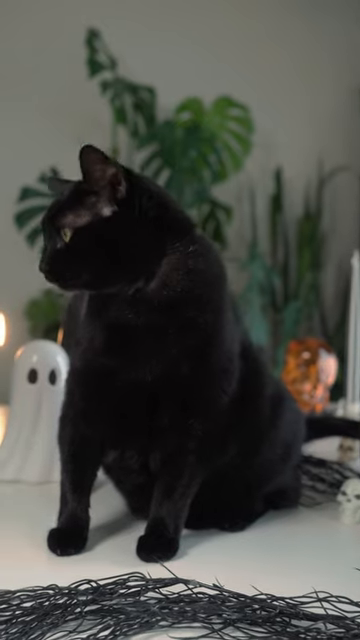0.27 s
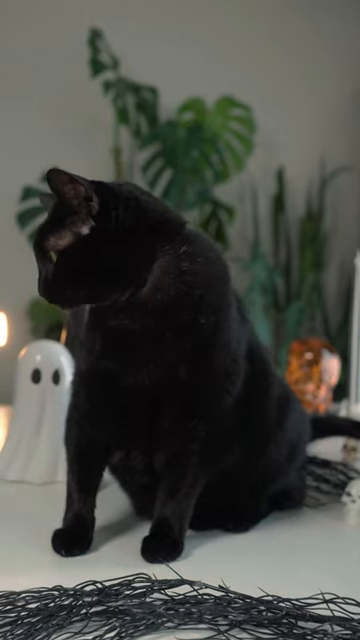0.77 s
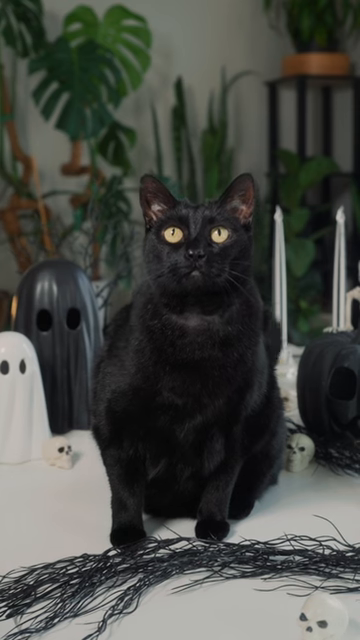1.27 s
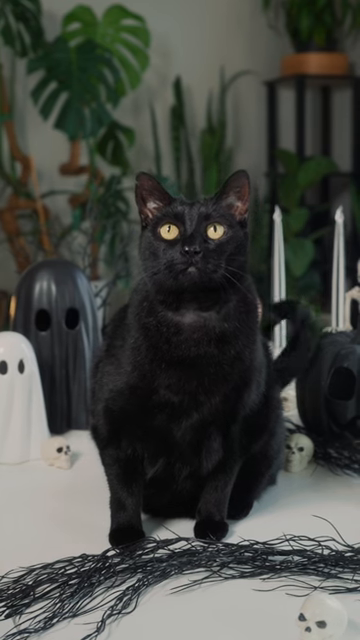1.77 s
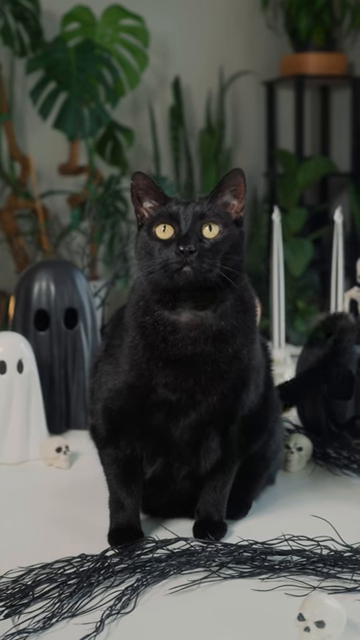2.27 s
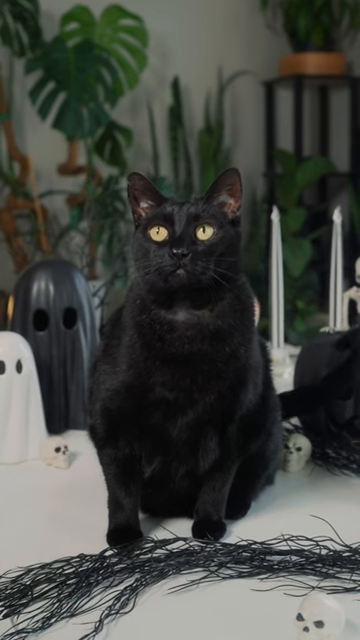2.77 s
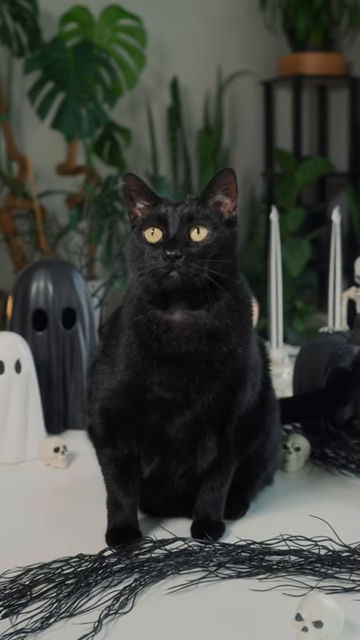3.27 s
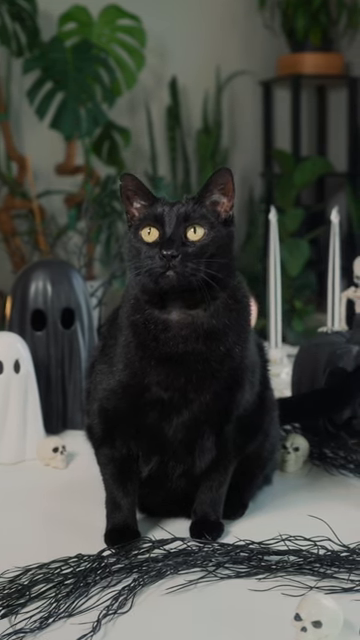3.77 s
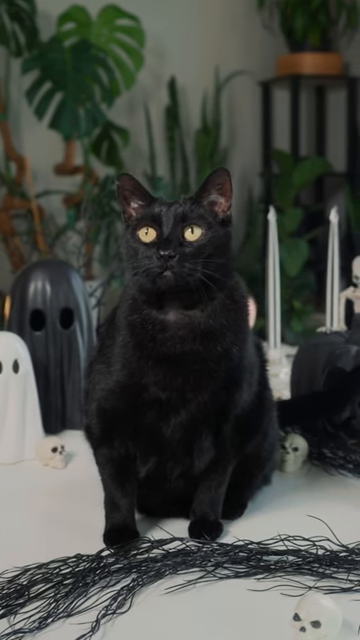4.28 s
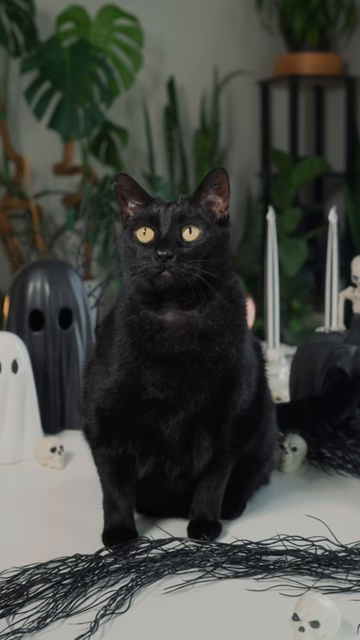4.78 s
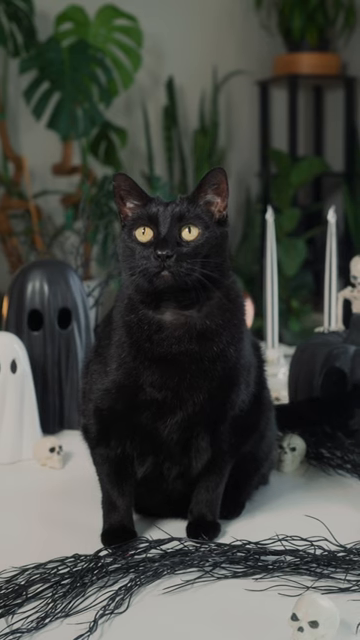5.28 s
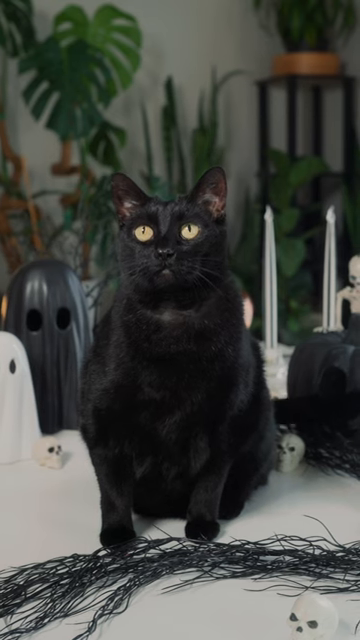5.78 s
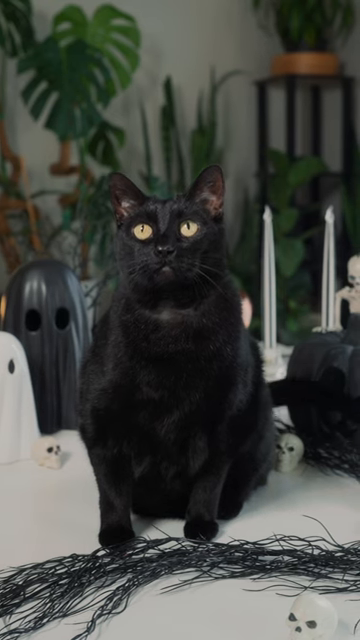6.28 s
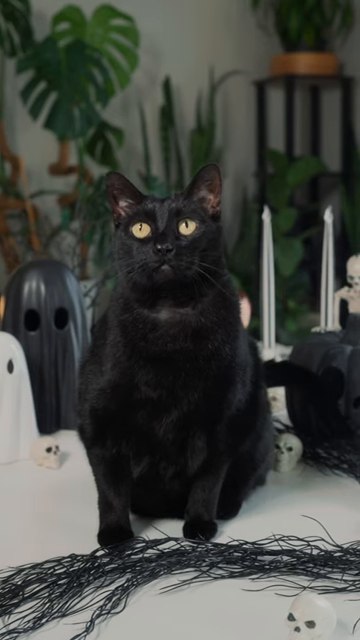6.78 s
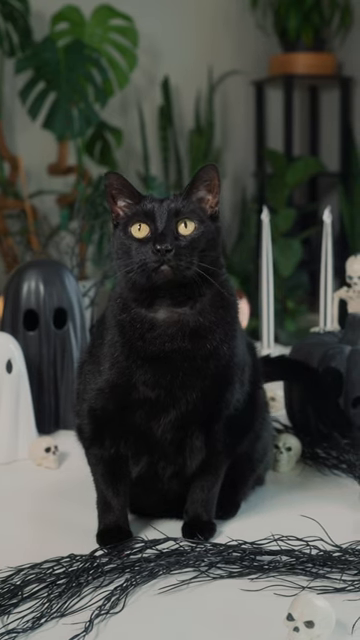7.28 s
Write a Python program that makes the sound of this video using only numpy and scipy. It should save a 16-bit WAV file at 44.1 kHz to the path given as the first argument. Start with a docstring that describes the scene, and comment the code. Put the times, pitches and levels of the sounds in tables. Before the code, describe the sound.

A cat purrs very close to the microphone in a quiet room. The low, fluttering rumble runs through both the in-breath and the out-breath, dipping briefly at each turn, about twice a second. Air rustles softly through its nose, and now and then its mouth gives a small wet click. Near the middle, the microphone picks up a faint, deep handling rumble.

```python
"""A cat purrs right at the microphone in a quiet room, on the in-breath and the out-breath alike.
Its larynx is a valve that interrupts the breath about 26 times a second: it shuts with a soft knock,
dams the air (the rumble) and snaps open, exciting the resonances of throat and head.
While it is open, turbulent air rustles through the nose. Beneath lie faint room noise and the
handling rumble of the nudged microphone; now and then the mouth clicks wetly."""
import sys
import numpy as np
from scipy import signal
from scipy.fft import rfft, irfft
from scipy.io import wavfile
from scipy.ndimage import uniform_filter1d

SR = 44100
rng = np.random.default_rng(int(sys.argv[2]) if len(sys.argv) > 2 else 0)


def dump_mix(stems):
    """Bounce the given channels to the path in sys.argv[1] as a 16-bit WAV at rate SR."""
    frames = np.atleast_2d(stems).T  # one column per channel
    limited = np.clip(frames, -1, 1)  # hard clip at full scale
    pcm = np.round(limited * 32767).astype(np.int16)
    wavfile.write(sys.argv[1], SR, pcm)


N = 332514
TIME = np.arange(N) / SR


def undb(db):
    """Amplitude ratio of a level in decibels."""
    return 10 ** (np.asarray(db) / 20)


def unit(x):
    """Normalisation to rms 1."""
    return x / np.sqrt(np.mean(x ** 2))


def impulses(times, sizes):
    """Impulse excitation: one-sample pushes at the given times."""
    out = np.zeros(N)
    np.add.at(out, np.clip((times * SR).astype(int), 0, N - 1), sizes)
    return out


def colour(x, points, pitch=1, size=4096):
    """Minimum-phase filter with an (f/Hz, level/dB) outline, shifted by a pitch ratio."""
    hz, db = np.transpose(points)
    grid = np.maximum(np.arange(size // 2 + 1) * SR / size, 1)
    outline_db = np.interp(np.log(grid), np.log(hz * pitch), db)
    cepstrum = irfft(np.log(undb(outline_db)))
    cepstrum[1:size // 2] *= 2
    cepstrum[size // 2 + 1:] = 0
    return signal.fftconvolve(x, irfft(np.exp(rfft(cepstrum))))[:len(x)]


def resonate(x, modes, pitch=1):
    """Modal superposition, two stages a mode; bony cavities follow the pitch ratio only halfway."""
    out = 0
    for hz, half_width, db in modes:
        b, a = signal.iirpeak(hz * np.sqrt(pitch), hz / (2 * half_width), fs=SR)
        out = out + undb(db) * signal.lfilter(b, a, signal.lfilter(b, a, x))
    return out


# Breaths, each lasting until the next: t/s, direction (+1 in, -1 out), flutter cycles,
# airway pitch ratio, quickening/Hz, attack/s, rise/dB, fade/dB, rumble/dB, throb (its overtones)/dB,
# snap/dB, swell skew/rad, rustle/dB, hiss/dB, pharynx/dB; the last three add to the snap column
BREATH_CYCLE = [ (-.386, -1, 13, 0.92, -0.5, 0.11, 5, 15.5, -7, -14.5, -32, 0.67, -42, -45, -23),
                (0.109, 1, 12, 0.93, 0.3, 0.12, 23, 4.5, -10, -17.5, -40.5, 0.27, -6.5, -20.5, -20),
                (0.5603, -1, 13, 0.86, 0.1, 0.15, 6.5, 12, -11, -17, -37, .87, -16, -47.5, -24.5),
                (1.075, 1, 11, 0.92, -1.15, 0.18, 7.5, 4.5, -10.5, -17.5, -39.5, 0.13, -5, -20, -20.5),
                (1.491, -1, 14, 0.87, 2.5, 0.22, 3.5, 15.5, -11.5, -18, -37.5, 0.9, -15, -45, -22.5),
                (2.053, 1, 12, 0.88, 0.36, 0.097, 8.5, 9, -16.5, -26, -40, .28, -12, -34.5, -28.5),
                (2.4983, -1, 14, 0.93, -0.3, .13, 7.5, 12.5, -18.5, -26, -43, 0.78, -10, -34.5, -55),
                (3.056, 1, 11, .97, 0, 0.37, 26, 10, -5.5, -14.5, -29, 0.74, -11.5, -39.5, -23.5),
                (3.461, -1, 13, 0.97, 2.5, 0.076, 0.5, 15, -6.5, -12.5, -33, 1, -15, -48, -27),
                (3.9658, 1, 15, 1.018, -0.2, 0.081, 9.5, 4.5, -9.5, -19, -32, 0.32, -15, -41, -38.5),
                (4.519, -1, 13, 0.95, 2.5, 0.061, 2, 15, -13.5, -19, -36.5, .83, -15, -43, -38),
                (5.031, 1, 12, 0.98, -1, .13, 13, 9.5, -11.3, -24.5, -37.5, 1.5, -16, -39, -47),
                (5.4742, -1, 15, 0.97, 1, 0.19, 4, 14, -19.5, -25.5, -43.5, 0.98, -16, -38.5, -42),
                (6.068, 1, 12, 0.97, 0.3, 0.12, 14.5, 7, -13, -25, -38, 1.6, -16, -48, -55),
                (6.531, -1, 18, 0.96, 2.15, 0.17, 2.5, 16, -22, -26.5, -43.5, 1, -18, -49, -39.5),
                (7.26, 1, 12, 0.96, -0.5, 0.13, 7, 10, -14, -27, -38, 1.2, -14.5, -39, -43)]


def purr(end_s=7.7105, muscle_s=0.014):
    """Common modulation: one flutter and one muscular effort drive rumble, snaps and airflow."""
    breaths = np.array(BREATH_CYCLE)
    turns = np.append(breaths[:, 0], end_s)
    current = np.searchsorted(turns, TIME, "right") - 1
    (start, direction, cycles, _, quickening_hz, attack_s, rise_db, fade_db,
     rumble_db, throb_db, snap_db, skew, rustle_db, hiss_db, pharynx_db) = breaths[current].T
    age, length = TIME - start, np.diff(turns)[current]
    phase = flutter(age, length, cycles, quickening_hz)
    muscle = int(muscle_s * SR)
    rising_db, fading_db = uniform_filter1d(effort(age, length, attack_s, rise_db, fade_db), muscle)
    rumble_db, throb_db, snap_db = uniform_filter1d([rumble_db, throb_db, snap_db], muscle)
    push_db, slack = rising_db + fading_db, slackness(turns)
    rumble_db += push_db
    throb_db += 0.99 * push_db + 0.5 * slack
    fade_share = np.where(direction > 0, 0.18, 0.86)  # breathing in, the snaps stay firm to the end
    snap_db += 0.64 * rising_db + fade_share * fading_db - 8.5 * slack
    return (rumble(phase, direction, skew, rumble_db, throb_db)
            + snaps(phase, direction, snap_db, pharynx_db)
            + airflow(phase, snap_db + rustle_db, snap_db + hiss_db))


def flutter(age, length, cycles, quickening_hz, start_phase=0.4):
    """Linear frequency glide: the larynx's phase in cycles, a whole number of them to each breath."""
    steady = cycles * age / length
    glide = quickening_hz * age * (age - length) / (2 * length)
    return np.unwrap(steady + glide, period=1) + start_phase


def effort(age, length, attack_s, rise_db, fade_db):
    """Power-law envelope in dB below the crest: a quick rise and an ever faster fade."""
    rising = np.clip(1 - age / attack_s, 0, 1) ** 1.6
    fading = np.clip((age - attack_s) / (length - attack_s), 0, 1) ** 2.59
    return -rise_db * rising, -fade_db * fading


def slackness(turns, lead_s=0.006, width_s=0.034):
    """Relaxation of the larynx: 1 where the flow reverses, 0 in between."""
    return sum(np.exp(-((TIME - turn + lead_s) / width_s) ** 2) for turn in turns)


def airway(x, shape, table, tail=2048):
    """Time-varying filter: the cat holds throat and nose a little differently for each breath."""
    out = np.zeros(N + tail)
    edges = [0] + [int(breath[0] * SR) for breath in BREATH_CYCLE[1:]] + [N]
    for a, b, breath in zip(edges, edges[1:], BREATH_CYCLE):
        out[a:b + tail] += shape(np.pad(x[a:b], (0, tail)), table, pitch=breath[3])
    return out[:N]


# Harmonics of the dammed air, from the flutter rate upwards: level/dB
INHALE_HARMONICS = [3, -5, -7, -21.5, -22, -33.5]
EXHALE_HARMONICS = [1, -6, -6, -17.5, -16, -25.5]


def rumble(phase, direction, skew, rumble_db, throb_db, crest=0.695, wobble=0.034, turn_s=0.013):
    """Fourier series of the pressure behind the shut larynx; its sign reverses with the flow."""
    cycles = np.arange(int(phase[-1]) + 2)
    jitter, shimmer = (np.interp(phase, cycles, c) for c in rng.standard_normal((len(cycles), 2)).T)
    angle = 2 * np.pi * (phase - crest + wobble * jitter)
    turn = int(turn_s * SR)
    inward, skew = uniform_filter1d(uniform_filter1d([(direction > 0) * 1., skew], turn), turn // 2)
    out = 0
    for share, harmonics in ((inward, INHALE_HARMONICS), (inward - 1, EXHALE_HARMONICS)):
        # skew turns the even swell into a fast rise and a slow ebb
        waves = [undb(db) * np.cos(k * angle - skew) for k, db in enumerate(harmonics, 1)]
        swell = undb(rumble_db) * unit(sum(waves[:2]))
        throb = undb(throb_db + 0.6 * shimmer) * unit(sum(waves[2:]))
        out = out + share * (swell + throb)
    return out


# Frequency response of throat and nose: f/Hz, level/dB
THROAT_RESPONSE = [(50, 11.5), (140, 7), (260, 5.5), (420, 0), (640, -2.5), (860, -4), (950, -11),
                   (1060, -21.5), (1320, -17.5), (1800, -30), (2300, -39.5), (3500, -76.5)]
# Modes of the head cavities and the pharynx: f/Hz, half-bandwidth of a stage/Hz, level/dB
HEAD_MODES = [(3300, 620, -35), (4410, 270, -36), (5590, 550, -32.5), (8020, 1330, -38), (11450, 1500, -47)]
PHARYNX_MODES = [(1693, 324, -2.5)]


def snaps(phase, direction, snap_db, pharynx_db, gain_db=48.5, shut_s=0.014, peel_s=0.0011):
    """Source and filter: once a cycle the larynx knocks shut, then snaps open, ringing the airways."""
    at = np.flatnonzero(np.diff(np.floor(phase)))
    force, treble, shut_jitter, knock, open_jitter, peel_lag = rng.standard_normal((len(at), 6)).T
    when = at / SR + 0.0004 * open_jitter
    size = direction[at] * undb(snap_db[at] + gain_db + 2 * force)
    inward = direction[at] > 0
    bright_db = np.where(inward, 0.5, -2.26) + 2.1 * treble
    knock_db = np.where(inward, -16, -5.5) + 2 * knock
    closing = impulses(when - shut_s + 0.0011 * shut_jitter, size * undb(knock_db))
    closing = signal.sosfilt(signal.butter(2, [170, 950], "band", fs=SR, output="sos"), closing)
    opening = impulses(when, size)
    # the wet folds peel apart in two steps, so every snap has its own colour
    peel = impulses(when + peel_s * (0.44 + np.abs(peel_lag)), size * undb(-11))
    throat = airway(closing + opening + peel, colour, THROAT_RESPONSE)
    head = airway(impulses(when, size * undb(bright_db)), resonate, HEAD_MODES)
    pharynx = resonate(opening * undb(pharynx_db), PHARYNX_MODES)
    return throat + head + pharynx


def gate(phase, centre, width):
    """Periodic Gaussian window; centre and width in cycles."""
    distance = (phase - centre + .5) % 1 - .5
    return np.exp(-.5 * (distance / width) ** 2)


# Spectrum of air rushing through the open larynx: f/Hz, level/dB
RUSTLE_SPECTRUM = [(80, -31.5), (180, 7.5), (400, 1), (750, -12), (1050, -19), (1350, -18.5), (2100, -36.5),
                   (3200, -32.5), (4200, -34.5), (5500, -30), (6600, -45), (8000, -30.5), (9800, -49),
                   (15000, -41.5)]
# Modes of the narrow nostrils: f/Hz, half-bandwidth of a stage/Hz, level/dB
NOSTRIL_MODES = [(2900, 220, -7), (4270, 220, -15.5), (5200, 540, -5.5), (8330, 240, 2), (11430, 1300, -3)]


def airflow(phase, rustle_db, hiss_db, rustle_gain_db=3):
    """Turbulence noise gated by the larynx; the nostrils hiss hardest just before it shuts."""
    flow = gate(phase, centre=0.26, width=0.25) + gate(phase, centre=0.5, width=0.032)
    jet = 0.22 * gate(phase, centre=0.14, width=0.076) + gate(phase, centre=0.5, width=0.045)
    rustle = unit(airway(flow * rng.standard_normal(N), colour, RUSTLE_SPECTRUM))
    hiss = unit(airway(jet * rng.standard_normal(N), resonate, NOSTRIL_MODES))
    return undb(rustle_db + rustle_gain_db) * rustle + undb(hiss_db) * hiss


# Envelope of the microphone's handling rumble: t/s, peak level/dB
SWAY_ENVELOPE = [(0, -46), (2.5, -42), (2.8, -10), (3.0, -16), (3.4, -22), (3.7, -40), (7.54, -46)]


def microphone_sway(hz=9.5, smooth_s=0.15):
    """Handling rumble: the nudged microphone wobbles, too low to hear as a tone."""
    level_db = np.interp(TIME, *np.transpose(SWAY_ENVELOPE))
    swell = uniform_filter1d(undb(level_db), round(smooth_s * SR))
    return swell * np.sin(2 * np.pi * (hz * TIME + rng.random()))


# Spectrum of the still room: f/Hz, level/dB
ROOM_SPECTRUM = [(20, -14.5), (100, -2.5), (300, -19.5), (900, -39.5), (2200, -52.5), (15000, -55)]


def room(rms_db=-59):
    """Stationary noise: the room's faint background, strongest in the bass."""
    return undb(rms_db) * unit(colour(rng.standard_normal(N), ROOM_SPECTRUM))


# Wet mouth clicks: t/s, level/dB, relative treble level/dB, gurgle f/Hz
WET_CLICKS = [(0.682, -28.5, 17, 510), (1.608, -21.5, 12.5, 330), (2.157, -23.5, 11.5, 607),
              (2.376, -24, 11, 635), (2.621, -31, 20, 700), (3.474, -19, -4, 600), (3.527, -23, -1, 340),
              (3.546, -10.5, 2, 480), (3.562, -23, 4, 295), (3.573, -24.5, 17, 416), (4.043, -9, 0, 375),
              (4.322, -16, 3, 498), (4.607, -14, 2.5, 540), (4.637, -21, 7.5, 440), (5.107, -13, -2, 596),
              (6.66, -19, 4.5, 406), (6.699, -28.5, 13, 557), (7.402, -28.5, 17.5, 714),
              (7.486, -19, 2, 503)]


def mouth_clicks(gurgle_db=-7, gurgle_s=0.0004, crackle_s=0.0018):
    """Damped free vibration: wet surfaces part, ringing throat, head and the air pocket between them."""
    gurgle, crackle = np.zeros((2, N))
    for start, level_db, treble_db, hz in WET_CLICKS:
        i = int(start * SR)
        t = TIME[:min(SR // 20, N - i)]
        pocket = np.exp(-t / gurgle_s) * np.sin(2 * np.pi * hz * t)
        gurgle[i:i + len(t)] += undb(level_db + gurgle_db) * pocket
        burst = np.exp(-t / crackle_s) * rng.standard_normal(len(t))
        crackle[i:i + len(t)] += undb(level_db + treble_db) * burst / np.linalg.norm(burst)
    times, levels_db, _, _ = np.transpose(WET_CLICKS)
    throat = airway(impulses(times, undb(levels_db)), colour, THROAT_RESPONSE)
    head = airway(crackle, resonate, HEAD_MODES)
    response_peak = np.abs(colour(signal.unit_impulse(SR // 10), THROAT_RESPONSE)).max()
    return gurgle + (throat + head) / response_peak


def scene():
    """Superposition: cat, handling rumble and room add in one channel."""
    cat = purr() + mouth_clicks()
    return (cat + microphone_sway() + room())[None]


def record(dry, top_hz=16000):
    """Soft saturation rounds the highest swells; a low-pass filter limits the bandwidth."""
    rounded = dry / (1 + dry ** 8) ** (1 / 8)
    return signal.sosfilt(signal.ellip(8, .2, 70, top_hz, fs=SR, output="sos"), rounded)


dry = scene()
out = record(dry)
dump_mix(out)
```